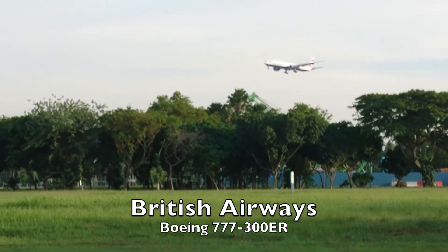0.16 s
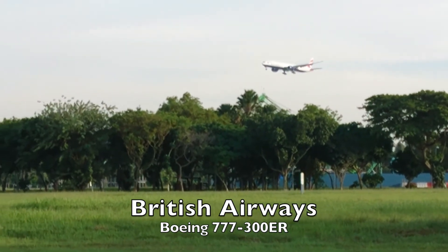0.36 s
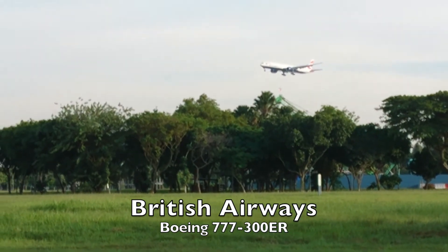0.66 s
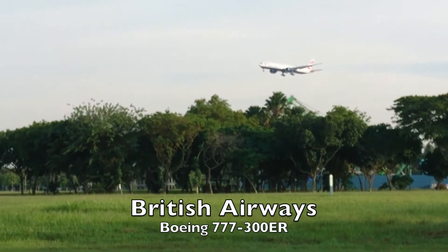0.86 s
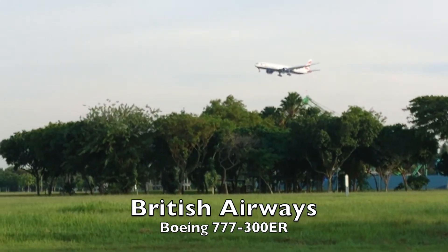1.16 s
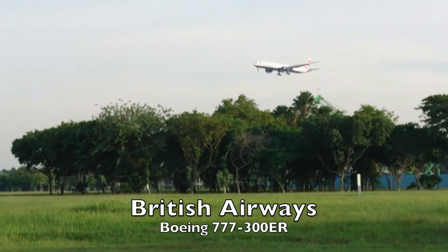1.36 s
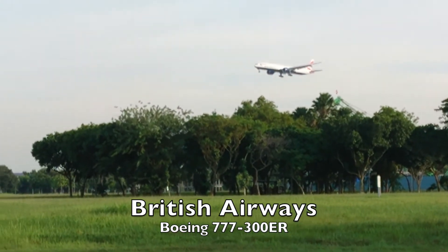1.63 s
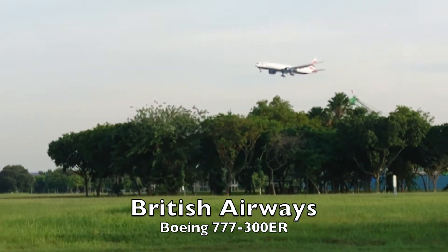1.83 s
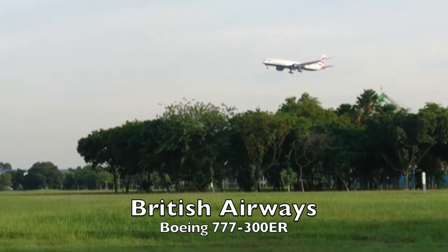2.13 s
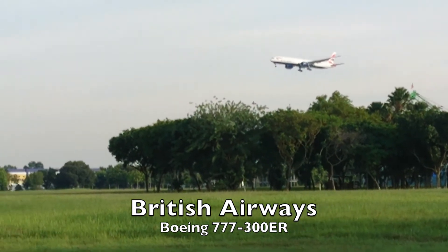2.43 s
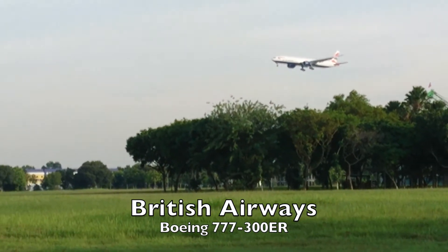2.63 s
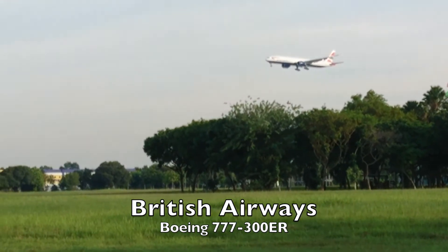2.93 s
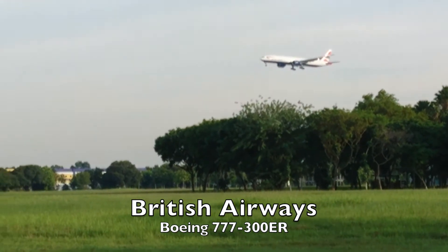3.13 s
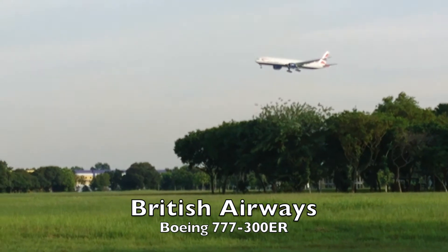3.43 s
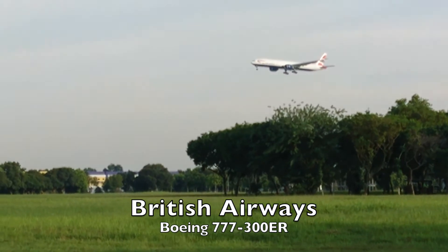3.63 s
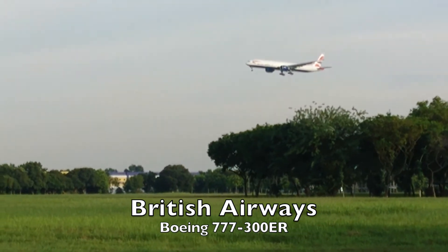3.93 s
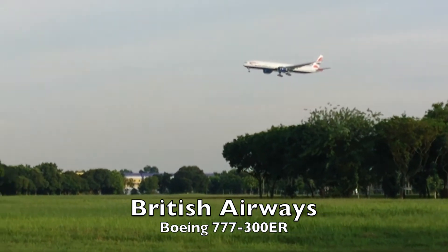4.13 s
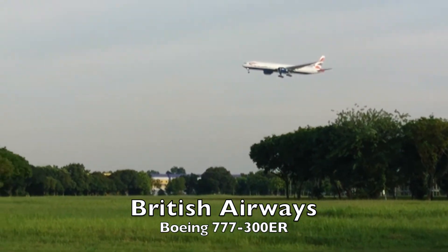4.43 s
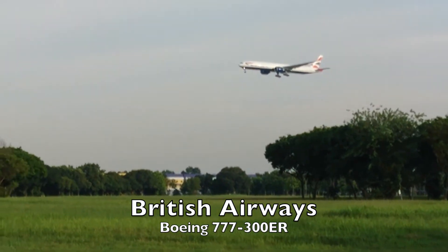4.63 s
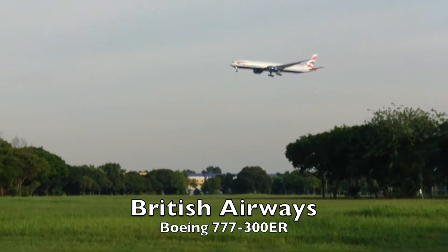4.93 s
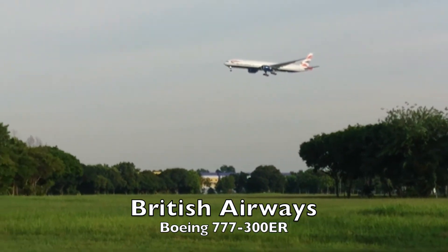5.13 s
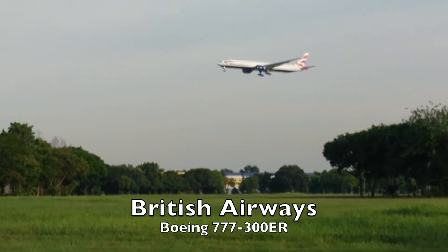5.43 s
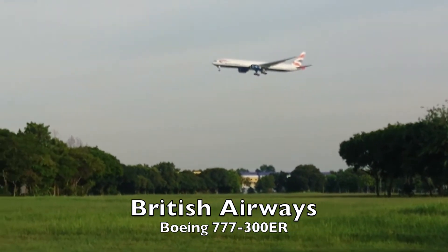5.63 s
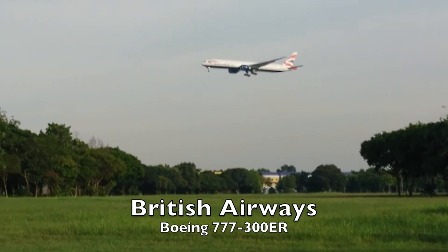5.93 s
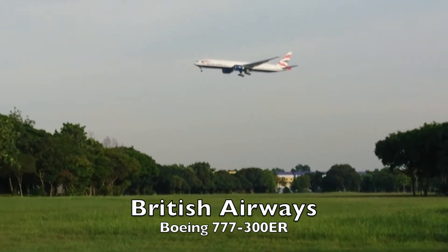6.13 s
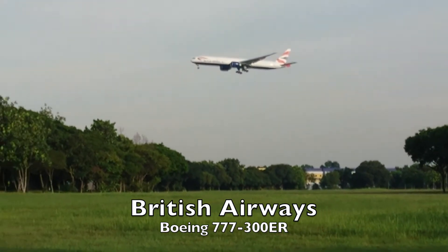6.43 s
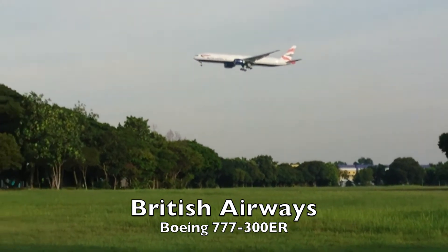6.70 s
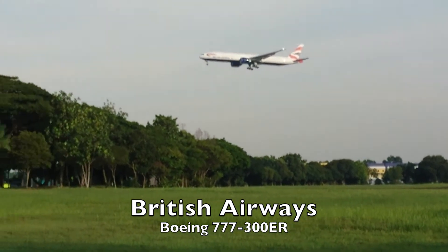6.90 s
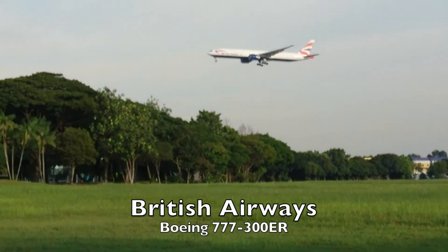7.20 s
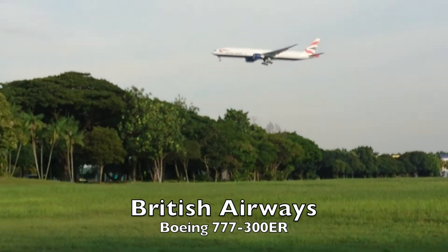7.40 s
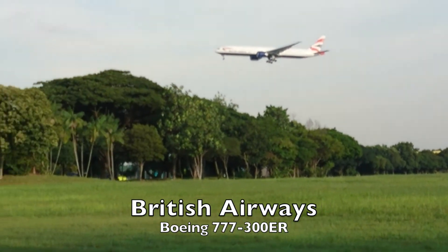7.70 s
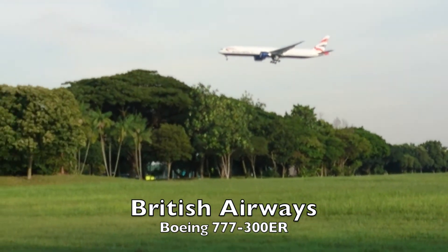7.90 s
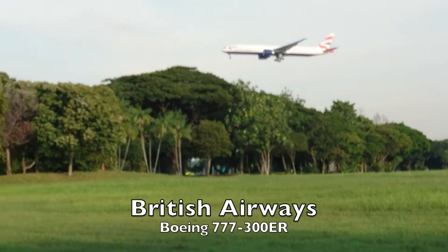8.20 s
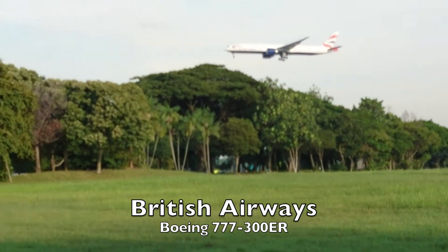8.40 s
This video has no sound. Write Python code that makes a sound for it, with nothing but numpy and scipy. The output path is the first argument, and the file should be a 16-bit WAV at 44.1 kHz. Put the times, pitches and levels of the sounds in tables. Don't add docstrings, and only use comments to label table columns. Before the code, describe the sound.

Outdoors on an open grass field, a large jet on approach is first screened by trees, then opens within about a second into a full, churning rumble and airy roar. A hollow howl slowly sinks in pitch inside it. Wind slams the handheld stereo camera's left microphone at about two seconds and again just after five, each pop distorting and briefly thinning the bass. Very faint insect and bird sounds sit far right.

```python
import sys
import numpy as np
from scipy import signal
from scipy.fft import rfft, irfft, next_fast_len
from scipy.io import wavfile
from scipy.ndimage import uniform_filter1d, map_coordinates

SR = 44100
rng = np.random.default_rng(int(sys.argv[2]) if len(sys.argv) > 2 else 0)


def transcribe(u):
    v = np.clip(np.atleast_2d(u).T, -1, 1)
    q = np.round(v * 32767).astype(np.int16)
    wavfile.write(sys.argv[1], SR, q)


def boost_factor(decibels):
    exponent = np.asarray(decibels, float) / 20
    return 10 ** exponent


N = 377143

# pitch_hz, level_db (per Hz)
PREAMP_SPECTRUM = [(3000, -23), (4600, 0), (5600, 0.5), (6500, -6), (7800, -3), (8500, -14), (10900, -14),
                   (11500, -22), (16000, -19.5)]
# pitch_hz, level_db (per Hz)
BREEZE_SPECTRUM = [(12, -40.5), (25, 5), (35, 14), (60, 6.5), (140, 0.5), (250, -46), (500, -130)]
INSECT_BLIPS = [.02, .08, .11, .15, .19, .23, .27, .31, .34, .4, .46, .52, .55, .74, .78, .81, .97, 1.06,
                1.11, 1.4, 1.8, 2.06, 2.25, 2.34, 2.72, 3.11, 3.23, 3.41, 4.34, 4.47, 4.61, 5.0, 6.14, 6.21,
                6.47, 6.51, 6.87, 6.94, 7.01, 7.06, 7.19, 7.25, 7.45, 7.61, 7.67, 7.84, 7.95, 7.98, 8.02,
                8.1, 8.15, 8.2, 8.27, 8.3, 8.46, 8.51]
# centre_s, pitch_hz, level_db
BIRD_CHIRPS = [(2.418, 3880, -50), (2.452, 4400, -53), (2.522, 3650, -52), (2.61, 4030, -54),
               (2.722, 4400, -52), (2.42, 7600, -71), (2.5, 6900, -66), (2.47, 6500, -64),
               (4.59, 7200, -68), (6.6, 7000, -66), (6.6, 6600, -64), (7.93, 7000, -64), (7.94, 6500, -61)]
# start_s, push_db, rise_ms, crack_db, crack_length_ms
WIND_POPS = [
    (2.13245, 13.3, 3, -2.8, .46),
    (5.16662, 7, .25, 4.2, .5),
]
# centre_s, peak_db, pitch_hz
SMALL_PUFFS = [(0.426, -18.5, 190), (2.95, -15.5, 263), (3.9, -24, 190), (4.67, -21, 190), (5.18, -8, 360),
               (5.87, -12, 149), (6.25, -22, 150), (8.131, -18, 191), (2.1292, -16.5, 1900),
               (2.131, -24, 1100), (2.132, -7, 905), (5.1634, -20, 1100)]
# centre_s, peak_db, pitch_hz
PORT_CLICKS = [
    (3.33, -36, 3200),
]
# pitch_hz, level_db (per Hz)
EXHAUST_SPECTRUM = [(10, -90), (25, -30.5), (32, -37), (52, -1.5), (100, -1), (150, -1.5), (230, -9),
                    (330, -20), (500, -76), (1000, -130)]
# pitch_hz, level_db (per Hz)
AIRFRAME_SPECTRUM = [(60, -100), (130, -42), (230, -5.5), (350, -3), (500, -2.5), (700, -1), (900, -11.5),
                     (1200, -19.5), (1700, -35), (3000, -130)]
# pitch_hz, level_db (per Hz)
BYPASS_SPECTRUM = [(300, -100), (600, -41), (900, -1.5), (1200, -1), (1600, -5), (2300, -4), (2800, -6.5),
                   (3300, -13), (4000, -34), (6000, -130)]
# pitch_hz, level_db (per Hz)
FAN_SPECTRUM = [(1500, -100), (2600, -18), (3300, -4), (3600, -5.5), (4000, -2), (4600, -3), (5100, -11),
                (6000, -13.5), (6600, -17.5), (7300, -32.5), (7800, -55), (9500, -66.5), (16000, -130)]
# time_s, delay_ms
GROUND_DELAY = [(0, 2.26), (3, 1.85), (6, 1.92), (8.6, 2.02)]
# pitch_hz, level_db
GRASS_RETURN = [(100, -2), (400, -9.5), (900, -12.5), (1500, -19.5), (3000, -38)]
# centre_s, half_length_s, lift_db, pitch_hz (changed most)
JET_SWELLS = [(1.33, 0.29, 5.5, 90), (1.703, 0.21, 4, 300), (2.085, 0.28, 6.5, 91.7), (2.547, 0.3, 8, 89),
              (3.125, 0.098, 5, 298), (3.28, 0.18, 3, 3200), (3.45, 0.092, 6.5, 80), (3.59, 0.25, 7.5, 650),
              (3.88, .13, 3, 3980), (4.08, 0.26, 5, 595), (5.004, 0.16, 6, 840), (5.412, 0.13, 5, 537),
              (5.854, 0.2, 4.5, 305), (6.553, 0.091, 1.5, 2800), (6.764, 0.16, 5.5, 333),
              (7.66, 0.36, 6, 4100), (5.5, .7, -1, 5500), (7.734, 0.21, 8, 304), (8.2, 0.17, -4, 91),
              (8.448, 0.19, 2.5, 450), (7.352, 0.043, 6.5, 250), (4.604, .12, -0.5, 4530),
              (5.135, .015, 5.5, 2700), (6.42, 0.045, 1, 70), (3.3, 0.093, 2, 99), (5.7, 0.083, 1.5, 80.5),
              (1.27, 0.1, -4.5, 140), (6.4, .1, 2, 60), (8.3, .12, 3, 200), (7.42, 0.082, 1.5, 190),
              (7.55, .1, -1.5, 520), (8.05, .08, 0.5, 550), (4.1, 0.19, 0.5, 90), (6.9, 0.052, 0.5, 100),
              (2.62, 0.092, -4, 70.5), (3, 0.055, -3, 80), (8.5, 0.042, 1, 4200)]
# centre_s, half_length_s, lift_db
HOWL_SWELLS = [(.3, .4, -2.5), (1.68, 0.13, 4.5), (2.5, .2, 2), (3.22, 0.15, 7), (3.518, 0.11, 4),
               (3.848, .15, -2.5), (4.35, .15, -3), (4.65, .12, 1.5), (5.1, 0.14, 6), (5.3, 0.091, 2),
               (5.8, 0.089, 2), (6.15, 0.17, -3), (6.6, .18, 4), (7.05, .12, 2.5), (7.35, .1, -5),
               (7.62, 0.13, 7), (7.919, .1, 5.5)]
# start_s, end_s, start_pitch_hz, end_pitch_hz, level_db
BRIEF_TONES = [(1.45, 2.1, 555, 595, -35.5), (2, 2.95, 598, 615, -37), (3.36, 3.75, 560, 534, -25),
               (7.5, 7.95, 488, 512, -23), (6.68, 6.92, 500, 550, -31), (1.6, 2.2, 2870, 3030, -53),
               (7.36, 7.86, 2720, 2630, -46), (4.6, 5.2, 2800, 2780, -51), (-.4, 1.9, 4020, 3955, -59),
               (2.9, 4.3, 3900, 3850, -56.5), (4.1, 5.3, 3830, 3790, -54), (5.2, 7.2, 3850, 3770, -56.5),
               (0, 1, 4470, 4420, -61), (.8, 2.2, 4420, 4560, -59.5), (2.2, 3.4, 4520, 4440, -55),
               (3.2, 4.15, 4450, 4340, -52), (4.2, 5.3, 4310, 4210, -53), (5.3, 6.2, 4310, 4250, -57.5),
               (6.5, 7.3, 4230, 4170, -57), (2.1, 2.7, 3040, 3010, -46), (2.8, 4.15, 2935, 2570, -45),
               (2.3, 3, 2800, 2700, -52), (4.35, 4.8, 2460, 2370, -46), (4.7, 6.1, 3510, 3400, -50),
               (6, 7.5, 3390, 3330, -53), (7.32, 7.48, 3620, 3610, -46), (7.45, 7.68, 3610, 3600, -52),
               (3.1, 4.1, 5040, 4880, -58), (4.2, 4.7, 4800, 4730, -59), (7.55, 7.72, 4090, 4070, -42),
               (7.73, 7.88, 4070, 4050, -45), (7.73, 7.9, 4580, 4570, -45.5), (7.38, 7.56, 4170, 4140, -46),
               (7.36, 7.68, 4530, 4570, -47), (7.55, 7.72, 3030, 3090, -45), (2.8, 3.4, 5660, 5520, -71),
               (5.55, 5.8, 2570, 2550, -45), (8.18, 8.5, 2670, 2620, -47), (8.1, 8.5, 518, 522, -26),
               (7.7, 8.8, 3520, 3480, -55), (7.9, 8.3, 4100, 4090, -54)]
# pitch_hz, left_minus_right_db
TONE_BALANCE = [(600, -5), (2600, -6), (3030, -9), (3450, 5), (3620, 3), (3900, -8), (4400, -20),
                (5000, -28)]
# pitch_hz, level_db
LEFT_PORT = [(60, -4), (160, -5), (410, -6.5), (660, -6), (1070, -9), (1720, -5), (2500, -2.5), (3100, -12),
             (3500, 0.5), (4200, -11), (4700, -30), (5500, -66), (6500, -29)]
# pitch_hz, likeness (0 to 1)
PORT_LIKENESS = [(60, 0.9), (110, 1), (250, 0.95), (500, 0.93), (800, 0.83), (1310, 0.6), (2430, 0.15),
                 (4500, 0.33)]
# pitch_hz, lag_radians
LEFT_LAG = [(30, 0), (340, .45), (1030, .7), (1640, 1.6), (2760, 2.3), (5000, 3)]
# time_s, left_later_samples, left_lift_db
CAMERA_TURNS = [(0, -1.5, 0), (.7, 0.5, 1.5), (1.5, -0.5, 0), (2.3, 2.2, 0.5), (3.5, 0.5, -0.5),
                (6.3, -1.3, 0.5), (6.7, 0.5, 0.5), (7.5, 0.36, 0), (8.55, 2, 0.5)]


def unit(x):
    return x / np.sqrt(np.mean(x ** 2) + 1e-20)


def along(points, hz):
    f, v = np.transpose(points)
    return np.interp(np.log(hz + 1), np.log(f + 1), v)


def curves(rows):
    s, *cols = np.transpose(rows)
    return [np.interp(np.arange(N) / SR, s, c) for c in cols]


def wobble(rate, size=N):
    knots = rng.standard_normal(int(size * rate / SR) + 4)
    return map_coordinates(knots, [np.arange(size) * rate / SR])


def filtered(x, response):
    m = next_fast_len(N + SR // 4)
    return irfft(rfft(x, m) * response(np.fft.rfftfreq(m, 1 / SR)), m)[..., :N]


def turbulence(spectrum, level_db, patchy_db):
    z = signal.stft(rng.standard_normal((2, N)), nperseg=512)[2]
    patches = uniform_filter1d(rng.standard_normal(z.shape[1:]), size=5, axis=0)
    patches = uniform_filter1d(patches, size=14, axis=1)
    pair = signal.istft(z * boost_factor(patchy_db * unit(patches)), nperseg=512)[1][:, :N]
    return boost_factor(level_db) * unit(filtered(pair, lambda hz: boost_factor(along(spectrum, hz))))


def breeze():
    gusts = boost_factor(5.2 * np.array([wobble(2.6), wobble(3.5)]))
    noise = filtered(rng.standard_normal((2, N)), lambda hz: boost_factor(along(BREEZE_SPECTRUM, hz)))
    return boost_factor(-52.5) * gusts * unit(noise)


def insect():
    blip_s = 0.045
    out, u = np.zeros(N + SR), np.arange(round(blip_s * SR)) / SR
    for s, (size, pitch) in zip(INSECT_BLIPS, rng.standard_normal((len(INSECT_BLIPS), 2))):
        hz = 11090 + 25 * s + 55 * pitch
        swell = np.sin(np.pi * u / blip_s) ** 2
        out[round(s * SR):][:len(u)] += boost_factor(-85 + size) * swell * np.sin(2 * np.pi * hz * u)
    return boost_factor([[-30], [0]]) * out[:N]


def bird():
    out, t = np.zeros(N), np.arange(-.06, .06, 1 / SR)
    u = t / .016
    for s, hz, db in BIRD_CHIRPS:
        blur = 1 + .5 * wobble(300, size=len(t))
        chirp = np.exp(-u ** 2) * blur * np.sin(2 * np.pi * hz * t * (1 - .01 * u))
        out[round((s - .06) * SR):][:len(t)] += boost_factor(db) * chirp
    return boost_factor([[-30], [0]]) * out


def pop(s, push_db, rise_ms, crack_db, crack_ms):
    t = np.arange(N) / SR
    u = np.maximum(t - s, 0)
    turns = 85 * u + .66 * (1 - np.exp(-u / .003))
    t60_s = .115 - .0042 * push_db
    rise = (1 - np.exp(-1000 * u / rise_ms)) ** 2
    swing = boost_factor(push_db - 60 * u / t60_s) * rise * np.sin(2 * np.pi * turns)
    v = (1000 * (t - s) + .75 - .3 * rise_ms) / crack_ms
    v = np.sign(v) * np.maximum(np.abs(v) - .125, 0)
    turns = np.where(v < 0, 1.2 * np.log(1 + np.abs(v)), 1.05 * v)
    fade = np.exp(-(v / np.where(v < 0, 8, 1.6)) ** 2) / np.hypot(1, 4.5 * v)
    return swing - boost_factor(crack_db) * fade * np.cos(2 * np.pi * turns)


def wind_on_ports():
    t = np.arange(N) / SR
    left = sum(pop(*row) for row in WIND_POPS)
    for s, db, hz in SMALL_PUFFS:
        near = slice(round((s - 2 / hz) * SR), round((s + 2 / hz) * SR))
        w = np.pi * hz * (t[near] - s)
        left[near] += boost_factor(db) * (1 - 2 * w ** 2) * np.exp(-w ** 2)
    left = filtered(left, lambda hz: 1 / (1 + (hz / 4200) ** 8))
    right = boost_factor(-41) * uniform_filter1d(left, size=60)
    for s, db, hz in PORT_CLICKS:
        right += boost_factor(db) * np.exp(-((t - s) * hz / 1.5) ** 2) * np.cos(2 * np.pi * hz * (t - s))
    return np.array([left, right])


def wind_filter():
    after = [np.maximum(np.arange(N) / SR - s, 0) for s, *_ in WIND_POPS]
    return sum(-7.5 * (1 - np.exp(-(u / 0.0069) ** 2)) * np.exp(-u / 0.37) for u in after)


def heard_db(centre_hz, level_db, trees_db, nears_db):
    t = np.arange(0, N / SR + .005, .005)
    trees = trees_db / (1 + np.exp((t - 0.94) / 0.37))
    db = level_db - trees + nears_db * t
    for s, half, lift_db, hz in JET_SWELLS:
        octaves = np.log2(hz / centre_hz) / 1.24
        db = db + lift_db * np.exp(-((t - s) / half) ** 2 - octaves ** 2)
    return np.interp(np.arange(N) / SR, t, db)


def fuzzy(hz, blur, flutter_db):
    rate = 2 * blur * hz.mean()
    steady = 1 / np.hypot(1, hz.mean() / 900)
    scatter = wobble(rate, size=len(hz)) + 1j * wobble(rate, size=len(hz))
    beads = unit(abs(scatter)) * np.exp(1j * np.angle(scatter))
    size = steady + np.sqrt(1 - steady ** 2) * beads
    tone = (size * np.exp(2j * np.pi * np.cumsum(hz) / SR)).real
    return unit(boost_factor(flutter_db * wobble(12, size=len(hz))) * tone)


def cavity_howl():
    t, start_hz = np.arange(N) / SR, 497
    hz = start_hz - (3.2 + .36 * t) * t
    db = -40.5 + 1.15 * heard_db(start_hz, 0, 3, 0)
    db = db + sum(lift_db * np.exp(-((t - s) / half) ** 2) for s, half, lift_db in HOWL_SWELLS)
    ends = np.clip((8.1 - t) / 0.14, 0, 1)
    return boost_factor([[-3.5], [2.5]]) * boost_factor(db) * ends * fuzzy(hz, blur=.012, flutter_db=1)


def fan_and_flap_tones():
    out = np.zeros((2, N))
    for start, end, start_hz, end_hz, db in BRIEF_TONES:
        at = np.arange(max(round(start * SR), 0), min(round(end * SR), N))
        u = np.clip((at / SR - start) / (end - start), 0, 1)
        swell = np.sin(np.pi * u) ** .5
        if start_hz < 1000:
            blur = .015
        else:
            core_or_fan = .006 if start_hz < 3200 else .015
            blur = core_or_fan + .001 / (end - start)
        tone = boost_factor(db) * swell * fuzzy(start_hz + u * (end_hz - start_hz), blur, flutter_db=1.5)
        left_db = along(TONE_BALANCE, start_hz)
        out[:, at] += boost_factor([[min(left_db, 0)], [min(-left_db, 0)]]) * tone
    return out


def jet_noise():
    exhaust_db = heard_db(centre_hz=105, level_db=-25.5, trees_db=7.5, nears_db=-0.0539)
    airframe_db = heard_db(centre_hz=505.5, level_db=-28, trees_db=7.5, nears_db=0.19)
    bypass_db = heard_db(centre_hz=1803, level_db=-32.5, trees_db=4, nears_db=0.0323)
    fan_db = heard_db(centre_hz=4206, level_db=-51.5, trees_db=4.5, nears_db=0.59)
    noise = turbulence(EXHAUST_SPECTRUM, exhaust_db + wind_filter(), patchy_db=1.0)
    noise = noise + turbulence(AIRFRAME_SPECTRUM, airframe_db, patchy_db=1.04)
    noise = noise + turbulence(BYPASS_SPECTRUM, bypass_db, patchy_db=1.0)
    return noise + turbulence(FAN_SPECTRUM, fan_db, patchy_db=1.1)


def off_the_grass(direct):
    earlier = np.arange(N) - curves(GROUND_DELAY)[0] * SR / 1000
    bounce = filtered(direct, lambda hz: boost_factor(along(GRASS_RETURN, hz)))
    return direct + [np.interp(earlier, np.arange(N), b) for b in bounce]


def at_the_ports(pair):
    def left_response(hz):
        port = boost_factor(along(LEFT_PORT, hz)) * np.exp(-1j * along(LEFT_LAG, hz))
        turn = np.arccos(np.clip(along(PORT_LIKENESS, hz), 0, 1))
        return port * [np.cos(turn), np.sin(turn)]

    later, lift_db = curves(CAMERA_TURNS)
    left = filtered(pair, left_response).sum(axis=0)
    left = map_coordinates(left, [np.arange(N) - later], mode="nearest")
    return np.array([boost_factor(lift_db) * left, pair[0]])


def scene():
    surroundings = breeze() + insect() + bird() + wind_on_ports()
    jet = cavity_howl() + fan_and_flap_tones() + at_the_ports(off_the_grass(jet_noise()))
    return surroundings + jet


def without_faint_bands(x, keep_db, follow):
    z = signal.stft(x, SR, nperseg=1024, scaling="psd")[2]
    power = abs(z) ** 2
    bands = power[:, :512].reshape(2, 128, 4, -1).mean(axis=2)
    loud = uniform_filter1d(bands[1, 16:32].mean(axis=0), size=9)
    kept = bands > boost_factor(2 * keep_db) * (loud / np.median(loud)) ** follow
    z[:, :512] *= np.repeat(kept, 4, axis=1)
    return signal.istft(z, SR, nperseg=1024, scaling="psd")[1][:, :N]


def band_limit(x):
    return signal.sosfilt(signal.butter(12, 15800, fs=SR, output="sos"), x)


def record(dry):
    wet = dry + turbulence(PREAMP_SPECTRUM, -81.5, patchy_db=-3.0)
    wet = wet / (1 + np.abs(wet / 1.015) ** 120) ** (1 / 120)
    mix = without_faint_bands(wet, keep_db=-117, follow=0.65)
    return band_limit(mix)


dry = scene()
out = record(dry)
transcribe(out)
```